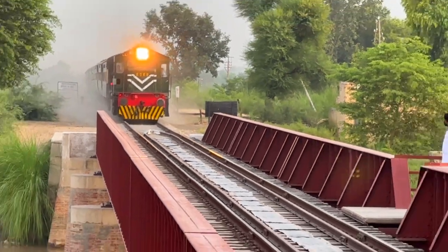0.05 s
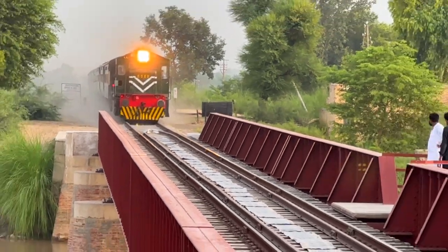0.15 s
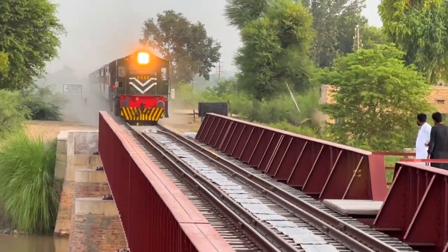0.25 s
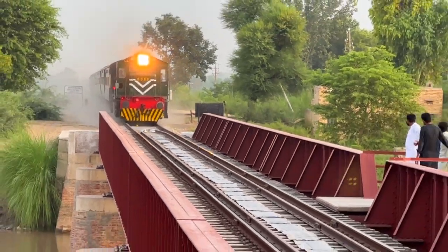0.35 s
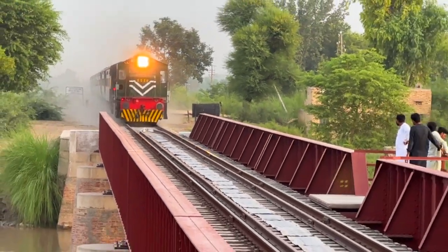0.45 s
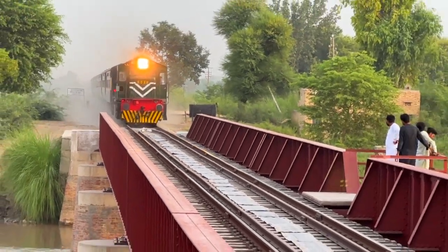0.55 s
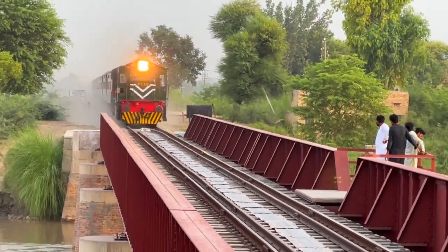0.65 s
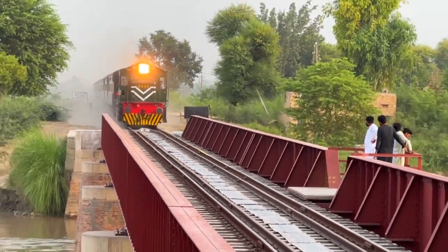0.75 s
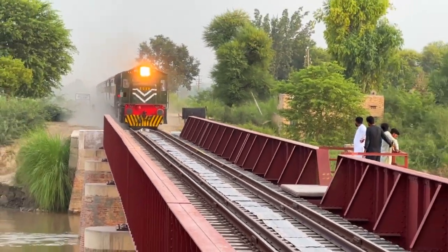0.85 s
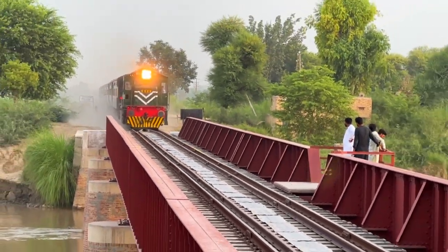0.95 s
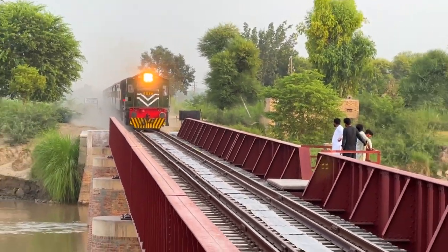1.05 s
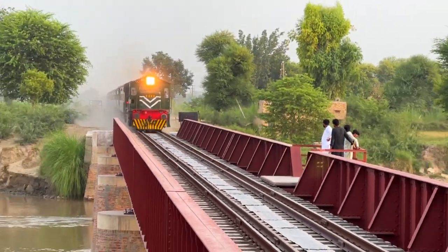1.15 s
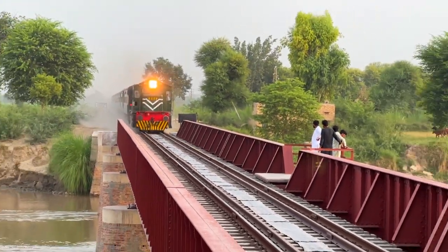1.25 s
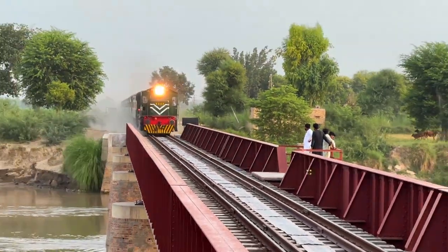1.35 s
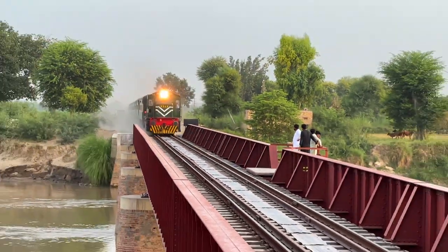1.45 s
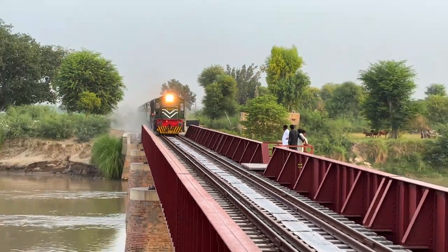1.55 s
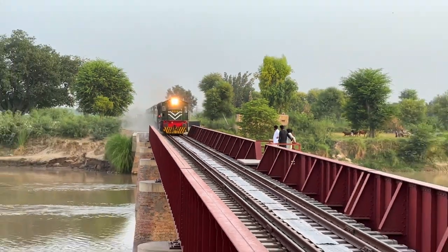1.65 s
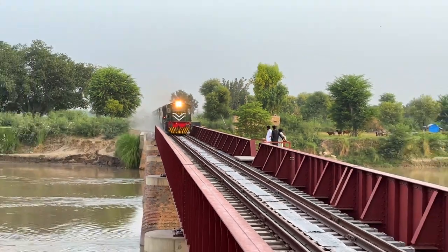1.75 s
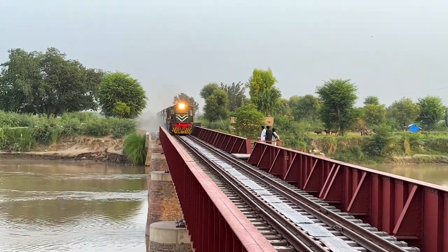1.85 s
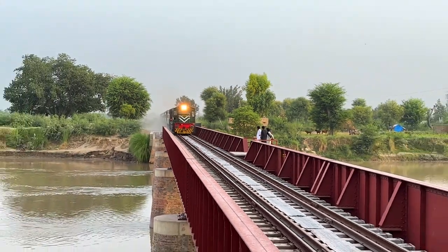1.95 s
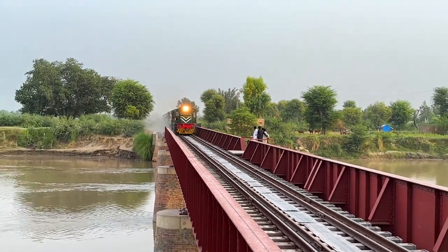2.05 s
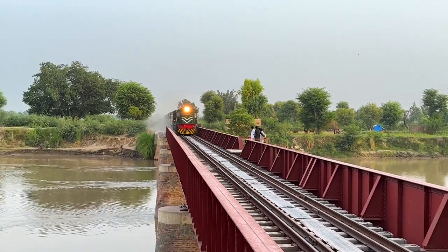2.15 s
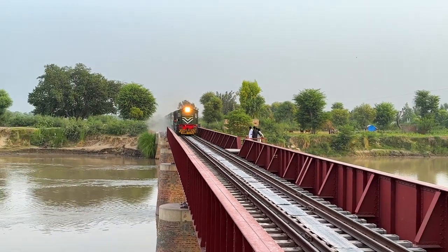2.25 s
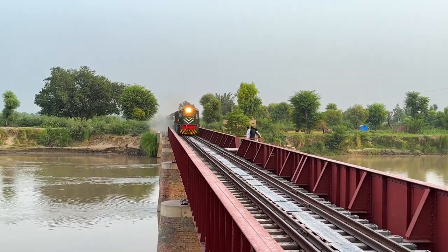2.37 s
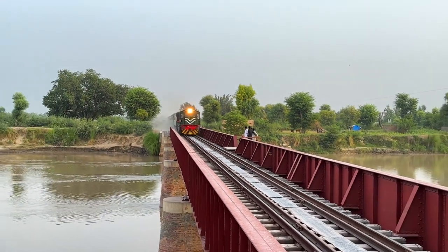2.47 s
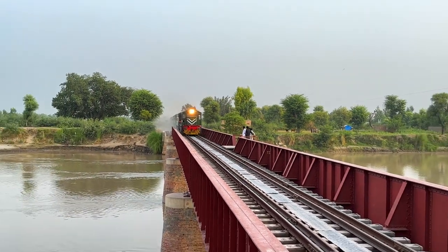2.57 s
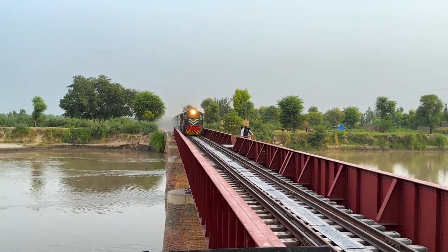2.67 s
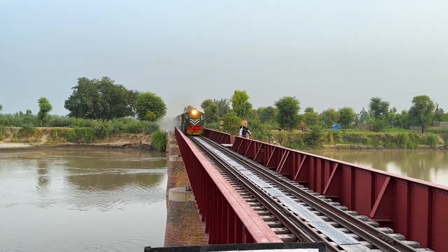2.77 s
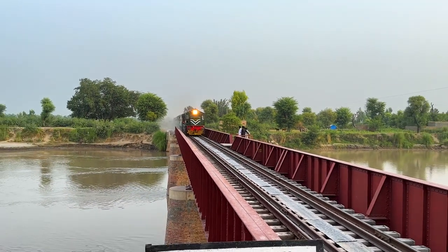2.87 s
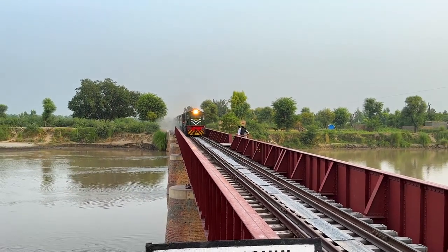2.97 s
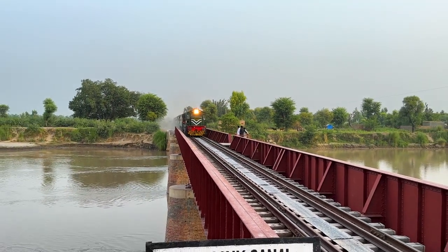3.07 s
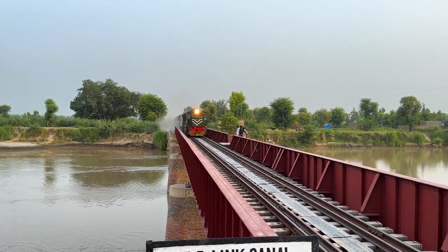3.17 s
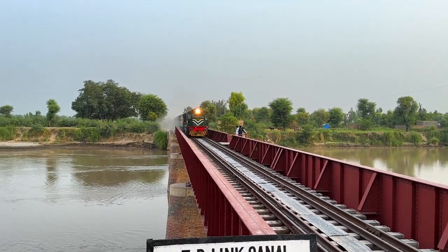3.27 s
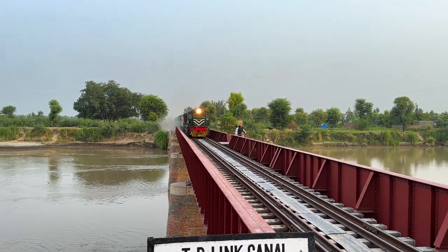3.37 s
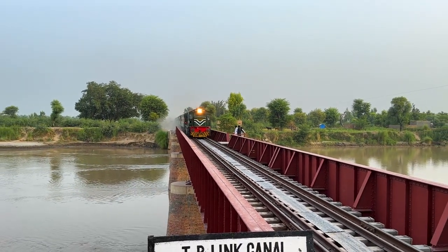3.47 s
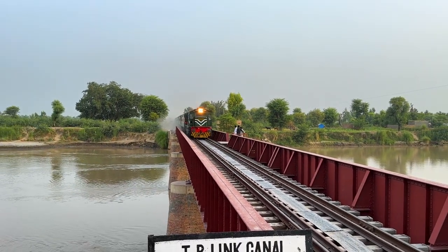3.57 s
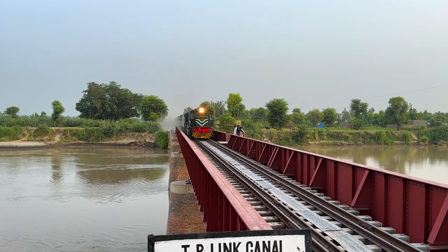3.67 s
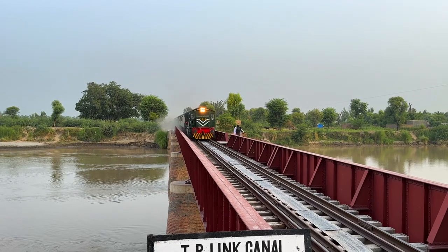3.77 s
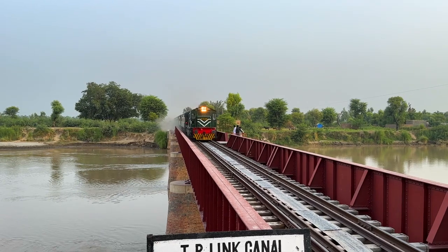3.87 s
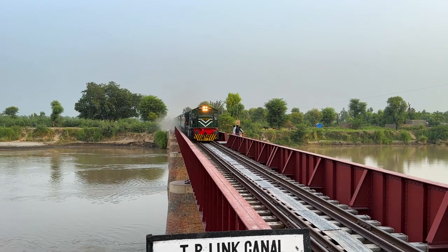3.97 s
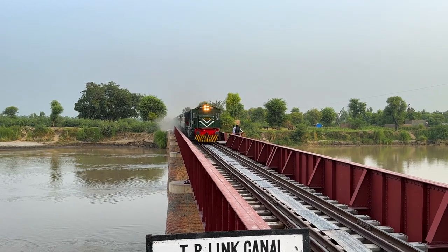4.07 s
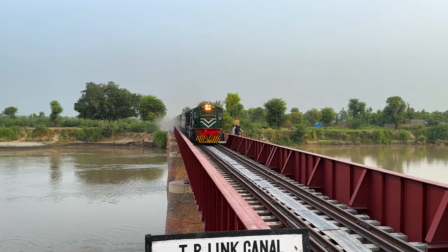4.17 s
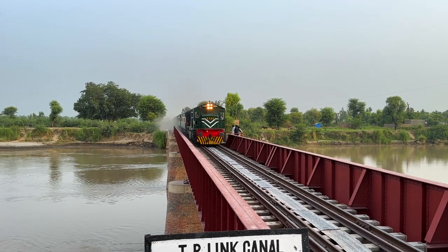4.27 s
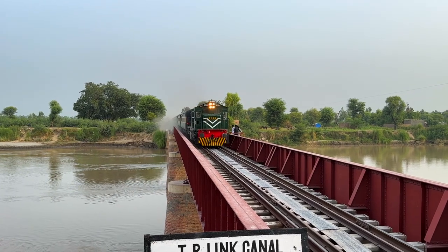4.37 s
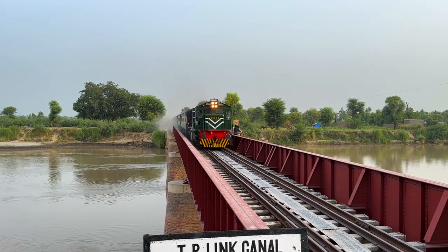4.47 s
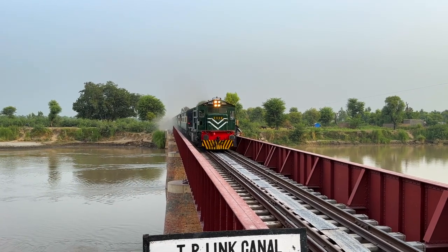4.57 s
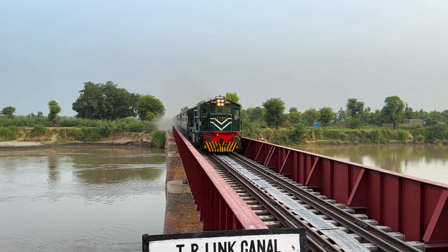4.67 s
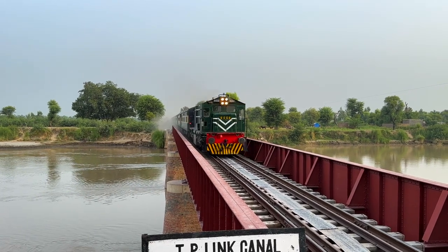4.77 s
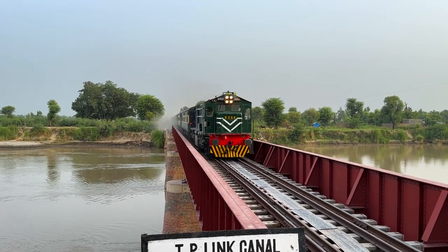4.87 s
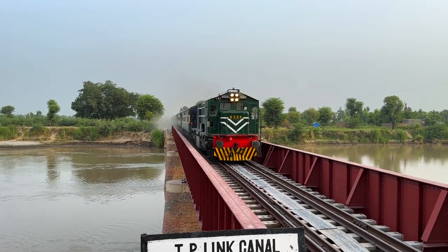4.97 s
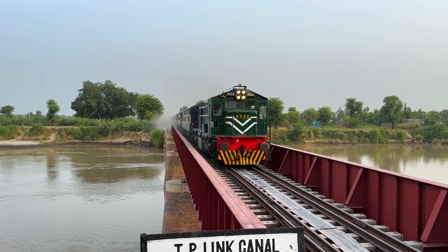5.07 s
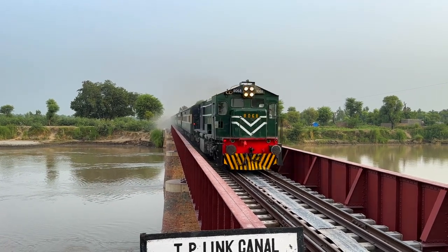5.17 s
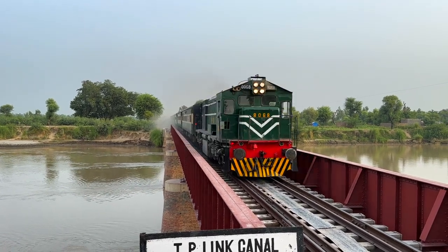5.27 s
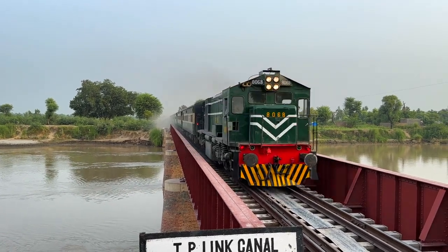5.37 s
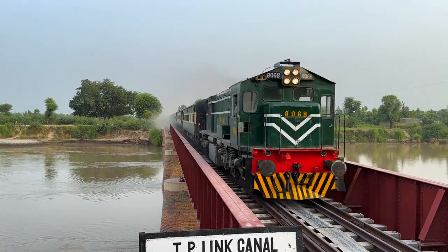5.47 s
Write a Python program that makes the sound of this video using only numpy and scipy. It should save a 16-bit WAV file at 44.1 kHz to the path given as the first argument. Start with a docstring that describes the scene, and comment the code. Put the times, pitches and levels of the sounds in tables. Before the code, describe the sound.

A diesel locomotive throbs closer and rolls onto a steel girder bridge, its rumble, ringing plates and wheel clacks growing to a loud metallic roar.

```python
"""Beside the track at a steel girder bridge, a diesel locomotive hauls its coaches nearer and rolls onto the span.
Firing pulses ring the exhaust stack; rolling noise resonates in span, plates and wheels; rail joints strike them.
The rails carry a wavering hum, filtered-noise hiss and ticks ahead of the train, with bursts of friction sizzle.
Plate swells, gliding ring-outs, grinding and clacks join in. Two closely spaced microphone ports hear it all."""
import sys
import numpy as np
from scipy import signal
from scipy.fft import rfft, irfft, next_fast_len
from scipy.io import wavfile
from scipy.ndimage import uniform_filter1d

SR = 44100
rng = np.random.default_rng(int(sys.argv[2]) if len(sys.argv) > 2 else 0)


def output_pcm(signal):
    """Save a mono or channel-first signal as 16-bit PCM at the path in sys.argv[1].

    Samples are clipped to [-1, 1] before scaling.
    """
    pcm = np.clip(np.atleast_2d(signal).T, -1, 1) * 32767
    wavfile.write(sys.argv[1], SR, np.round(pcm).astype(np.int16))


N = 243431
TIME = np.arange(N) / SR  # s
SIZE = next_fast_len(N + SR // 2)  # transform length, padded so that filters can ring out
FREQ = np.maximum(np.arange(SIZE // 2 + 1) * SR / SIZE, 1)  # Hz
SIDES = np.array([[1], [-1]])  # left, right


def from_db(db):
    """Logarithmic level: decibels become an amplitude gain."""
    return 10 ** (np.asarray(db) / 20)


def rms_one(x):
    """Power normalisation: scale to unit mean square."""
    return x / np.sqrt(np.mean(x ** 2) + 1e-20)


def steady(x, seconds=0.27):
    """Running power normalisation: unit power over every short stretch."""
    power = uniform_filter1d(np.mean(np.atleast_2d(x) ** 2, axis=0), max(int(seconds * SR), 64))
    return x / np.sqrt(power + 1e-12)


def in_time(rows):
    """Linear interpolation: one curve per column, a value for each sample."""
    s, *columns = np.transpose(rows)
    return [np.interp(TIME, s, column) for column in columns]


def around(s, before_s, after_s):
    """Time window: the samples around a moment."""
    return slice(*np.searchsorted(TIME, [s - before_s, s + after_s]))


def colour(points):
    """Spectral envelope: gain against log frequency, falling 20 dB per octave beyond the table."""
    hz, db = np.transpose(points)
    octaves_outside = np.abs(np.log2(FREQ / np.clip(FREQ, hz[0], hz[-1])))
    return from_db(np.interp(np.log(FREQ), np.log(hz), db) - 20 * octaves_outside)


def resonances(modes):
    """Modal superposition: parallel resonators of alternating sign."""
    response = 0
    for k, (hz, width, db) in enumerate(modes):
        resonator = 1 / (1 + 1j * (FREQ ** 2 - hz ** 2) / (FREQ * width))
        response = response + (-1) ** k * from_db(db) * resonator
    return response


def filtered(x, response):
    """Linear filtering: multiply the spectrum by a frequency response."""
    return irfft(rfft(x, SIZE) * response, SIZE)[..., :N]


def resonant(x, hz, width):
    """Resonant filtering: noise twice through one resonance, at unit power."""
    b, a = signal.iirpeak(hz, hz / width, fs=SR)
    once = signal.lfilter(b, a, x)
    return steady(signal.lfilter(b, a, once), seconds=0.062)


def drift(rate):
    """Low-pass random modulation: slow chance of spread 1, drawn at every 32nd sample."""
    size = SIZE // 32
    low_pass = 1 / (1 + (FREQ[:size // 2 + 1] / rate) ** 4)
    slow = irfft(rfft(rng.standard_normal(size)) * low_pass, size)
    return rms_one(np.interp(np.arange(N) * size / SIZE, np.arange(size), slow))


def wavering(hz, wander_hz, rate):
    """Frequency modulation: a tone of unit power whose pitch wanders."""
    turns = np.cumsum(hz + wander_hz * drift(rate)) / SR
    return np.sqrt(2) * np.sin(2 * np.pi * (rng.random() + turns))


def swaying(x, depth_s, rate):
    """Doppler effect: a slowly changing path shifts all the pitches of a sound up and down together."""
    reading = TIME + depth_s * drift(rate)
    return np.array([np.interp(reading, TIME, channel) for channel in x])


def swell(s, half_s, db):
    """Gaussian envelope: rises to its top and falls again."""
    out, part = np.zeros(N), around(s, .5, .5)
    out[part] = from_db(db) * np.exp(-np.minimum(((TIME[part] - s) / half_s) ** 2, 20))
    return out


def blows(rows, rise_s, fall_s):
    """Impact response: each blow swells quickly and dies away exponentially."""
    out = np.zeros(N)
    for s, db in rows:
        part = around(s, 0, 10 * fall_s)
        age = TIME[part] - s
        out[part] += from_db(db) * (1 - np.exp(-age / rise_s)) * np.exp(-age / fall_s)
    return out


def ring_outs(rows):
    """Transient modes: short notes of the steelwork, with any glide in pitch as the load moves on."""
    out = np.zeros(N)
    for (s, half_s, hz, db, glide_hz_per_s), phase in zip(rows, rng.random(len(rows))):
        part = around(s, .5, .5)
        age = TIME[part] - s
        turns = phase + hz * age + .5 * glide_hz_per_s * age ** 2
        out[part] += swell(s, half_s, db)[part] * np.sin(2 * np.pi * turns)
    return np.sqrt(2) * out


# diffuse share of the sound at the ports, far and near: (frequency [Hz], side-to-mid level [dB])
DIFFUSE_FAR = [(60, -26), (200, -20), (400, -14.5), (750, -11.5), (1200, -12), (2000, -65), (3400, -17),
               (6200, -57), (8300, -48), (9600, -11), (11500, -40), (13000, -40), (15000, -16)]
DIFFUSE_NEAR = [(60, -31), (200, -19), (400, -16.5), (750, -3), (1100, -9), (1600, 1.5), (2050, -9.5),
                (2400, -3.5), (4000, -4.5), (6000, -1), (9500, -4.5), (11500, -22), (13000, -15),
                (15000, -12)]


def noise(near, lead_s=0):
    """Spatial coherence: stereo white noise whose diffuse part changes from its far to its near share."""
    direct, diffuse = rng.standard_normal((2, N))
    far, close = filtered(diffuse, np.array([colour(DIFFUSE_FAR), colour(DIFFUSE_NEAR)]))
    if lead_s:
        direct = filtered(direct, np.exp(1j * np.pi * FREQ * lead_s * SIDES))  # left ahead of right
    return direct + ((1 - near) * far + near * close) * SIDES


def share(bass_db, loaded, part):
    """Load transfer: the level of one part of the bass shifts with the weight on the span."""
    empty_db, weight_db = part
    return bass_db + empty_db + weight_db * loaded


MIDWAY_DB = -28  # rolling level at which a law gives its own level


def follow(rolling_db, loaded, law):
    """Forced vibration: a part follows the rolling wheels, more strongly once they are on the span."""
    midway_db, slope, empty_db = law
    return midway_db + slope * (rolling_db - MIDWAY_DB) - empty_db * (1 - loaded)


# exhaust stack resonances: (frequency [Hz], width [Hz], relative level [dB])
STACK_MODES = [(89.5, 71, -7), (164.7, 24.7, 7.5), (206, 77, -2)]
# clean exhaust tones: (multiple of the firing rate [1], relative level [dB])
EXHAUST_TONES = [(1, -0.5), (2, -3.5)]
FIRING_HZ = 80.9  # mean rate


def exhaust(stack_db, throb_db, rough=0.18, gas=0.17, wander=.007, surge_db=2.5, count=12):
    """Pulse excitation: unequal cylinder puffs ring the stack over a clean throb at the firing rate."""
    turns = np.cumsum(FIRING_HZ * (1 + wander * drift(4))) / SR
    fires = np.flatnonzero(np.diff(np.floor(turns)))
    cylinders = 1 + rough * rng.standard_normal(count)
    puffs = np.zeros(N)
    puffs[fires] = cylinders[np.arange(len(fires)) % count] + rough * rng.standard_normal(len(fires))
    puffs += gas * np.exp(-3 * (turns % 1)) * rng.standard_normal(N)  # turbulent gas follows each puff
    muffler = 1 / (1 + 1j * FREQ / 420) ** 2
    stack = from_db(stack_db) * steady(filtered(puffs, resonances(STACK_MODES) * muffler), seconds=0.052)
    throb = 0
    for multiple, db in EXHAUST_TONES:
        level = from_db(throb_db + db + surge_db * drift(5.4))
        throb = throb + level * np.sin(2 * np.pi * multiple * turns)
    return stack + np.sqrt(2) * throb


# wheels on rail joints, before attack and decay: (time [s], plate clang [dB], span thump [dB])
RAIL_JOINTS = [(1.57, -16.5, -40), (1.795, -22, -30), (2.071, -33, -25), (2.201, -30, -25),
               (2.37, -37, -20), (2.644, -16, -31), (2.835, -32, -12.5), (3.29, -25, -31),
               (3.489, -15, -27), (3.668, -26, -17), (3.826, -24, -14), (3.94, -26, -27), (4.465, -23, -24),
               (4.538, -15, -30), (4.66, -18, -17), (4.825, -26, -16), (4.94, -15, -17), (5.14, -18, -25),
               (5.306, -13, -14), (5.42, -25, -13)]
# spectral envelope of the span: (frequency [Hz], relative level [dB])
SPAN_COLOUR = [(20, -21), (35, -22), (48, -7.5), (62, -0.5), (84, -6), (108, -3), (140, -11), (200, -11.5),
               (300, -24)]
# higher boom right under the locomotive, passed twice: (frequency [Hz], width of one pass [Hz])
CLOSE_SPAN_MODE = (102.3, 40)
# deep surges of the span: (time of top [s], half length [s], pitch [Hz], level [dB])
SPAN_SURGES = [(0.898, .045, 82, -31.5), (1.314, 0.051, 82.4, -29), (1.48, 0.047, 79.5, -29.5),
               (1.868, 0.04, 80, -30), (1.997, 0.069, 106, -27), (2.259, 0.046, 68.5, -28),
               (2.762, 0.057, 72.4, -26), (3.059, 0.027, 130, -22), (3.55, 0.044, 125, -23),
               (3.35, .036, 85, -19), (3.7, .04, 69, -20), (3.79, .05, 172, -23.5), (3.807, 0.052, 76, -18),
               (3.83, 0.028, 120, -17.5), (3.951, 0.027, 75, -17.5), (4.63, .04, 89, -18),
               (4.681, .035, 80.6, -13.5), (4.98, 0.065, 101, -23)]


def span_rumble(rumble_db, near, close_db=7):
    """Structure-borne sound: the span rumbles under the wheels, thumps at each joint and surges at times."""
    thump_rows = [(s, thump_db) for s, _, thump_db in RAIL_JOINTS]
    thumps = blows(thump_rows, rise_s=0.0015, fall_s=0.024)
    close_response = resonances([(*CLOSE_SPAN_MODE, 0)]) ** 2
    close = from_db(close_db) * near ** 6 * filtered(noise(near), close_response)
    rumble = steady(filtered(noise(near), colour(SPAN_COLOUR)) + close, seconds=0.051)
    surges = ring_outs([(*surge, 0) for surge in SPAN_SURGES])  # no glide
    return np.hypot(from_db(rumble_db), thumps) * rumble + surges


# web plates of the girders, before contact smoothing: (frequency [Hz], width [Hz], relative level [dB])
PLATE_MODES = [(232, 120, -19.5), (297, 26, -3.5), (363, 37, -2.5), (411, 30.6, -3.5), (469, 60, -7.5),
               (518, 33.5, -4.5), (571, 43, -9.5)]
# plates and wheel discs ringing out: (time of top [s], half length [s], pitch [Hz], level [dB], glide [Hz/s])
STEEL_RINGS = [(.38, 0.062, 398, -32.5, -100), (2.13, .04, 508, -29.5, 0), (2.26, 0.012, 507, -25.5, 0),
               (2.42, 0.039, 548, -25, -500), (2.67, 0.047, 517, -23.5, -300),
               (3.46, 0.045, 518, -21.5, 200), (3.76, .07, 428, -27, 0), (4.0, 0.061, 529.5, -22.5, 0),
               (4.33, .033, 513, -19, 600), (4.475, 0.016, 710, -20, -1500),
               (4.555, .035, 415, -15.5, -700), (4.65, 0.022, 530.5, -17, -400),
               (4.775, 0.019, 603, -18, 0), (4.78, .03, 1040, -28.5, -1200),
               (4.84, 0.038, 385, -15.5, -1100), (4.95, .035, 410, -22, 0), (5.125, 0.047, 863.5, -22.5, 0),
               (5.16, 0.032, 529, -20, 0), (5.17, 0.044, 435, -22, 700), (5.21, .022, 577, -20, 0),
               (5.25, 0.021, 696, -17, -1200), (5.285, .022, 464, -15, -1500), (5.32, 0.023, 538, -19, 3),
               (5.345, 0.045, 380, -20.5, 1100), (5.4, 0.038, 521, -17, 1200),
               (5.44, 0.042, 720, -20.5, 900), (5.495, .02, 605, -17, -1000)]
# spectral envelope of the wheel roar, also part of each clang: (frequency [Hz], relative level [dB])
ROAR_COLOUR = [(150, -10), (270, -1.5), (520, 3), (590, -1.5), (640, 0.5), (712, 3), (780, 1.5), (860, 2.5),
               (1000, 0.5), (1130, -6.5), (1300, -18), (1800, -22.5)]
GIRDER_LOW, GIRDER_HIGH = (263.4, 116), (493, 170)  # broad ringing, passed twice: Hz, width of one pass in Hz


def girders(drone_db, near, loaded, low_db=-14, weight_db=11, close_low_db=-2, high_db=-3):
    """Modal excitation: rough treads and joints ring the plates, low ones under weight, high ones close by."""
    contact = 1 / (1 + (FREQ / 760) ** 6) / (1 + (170 / FREQ) ** 4)  # the contact patch smooths short bumps
    plates = resonances(PLATE_MODES) * contact
    ringing = swaying(filtered(noise(near), plates), depth_s=.0014, rate=2.96)
    close = near ** 6
    low_gain = from_db(low_db + weight_db * loaded ** 2 + close_low_db * close)
    low = low_gain * filtered(noise(near), resonances([(*GIRDER_LOW, 0)]) ** 2)
    high = from_db(high_db) * close * filtered(noise(near), resonances([(*GIRDER_HIGH, 0)]) ** 2)
    rolling = from_db(drone_db) * steady(ringing + low + high, seconds=0.07)
    struck = plates + contact * resonances([(302, 5.9, 0.0051)]) + from_db(-31.0) * colour(ROAR_COLOUR)
    clang_rows = [(s, clang_db) for s, clang_db, _ in RAIL_JOINTS]
    clangs = blows(clang_rows, rise_s=0.0016, fall_s=0.033)
    knocks = clangs * steady(filtered(noise(near), struck), seconds=0.044)
    return rolling + knocks + ring_outs(STEEL_RINGS)


def wheel_roar(rolling_db, near, roar_db=1.4, close_db=2.0):
    """Rolling contact noise: a mid-range roar; the closest bogie adds a hollow ring of its wheel discs."""
    rolling = swaying(filtered(noise(near), colour(ROAR_COLOUR)), depth_s=0.001207, rate=4.05)
    discs = from_db(10.5) * near ** 12 * filtered(noise(near), resonances([(627, 400, 0)]) ** 2)
    return from_db(rolling_db + roar_db + close_db * near) * steady(rolling + discs, seconds=0.07)


# singing hum of the track, before wavering: (time [s], reference level [dB], reference pitch [Hz])
HUM_COURSE = [(0, -45, 419), (.24, -46, 419.5), (.33, -33, 418.5), (.5, -37, 417.7), (.75, -34, 415.5),
              (1.1, -28.5, 418), (1.2, -31, 418), (1.28, -27, 417.7), (1.5, -25, 419.2), (1.58, -27.5, 419),
              (1.95, -28.5, 418.5), (2.3, -38, 416.1), (4.0, -28, 418.6), (5.52, -25, 413)]
# its tones: (multiple of the pitch [1], relative level [dB], rms wander [Hz])
HUM_PARTIALS = [(1, -1, 0.82), (.925, -11, 3.097), (.86, -19, 1.8), (1.052, -15, 3.2), (1.187, -19, 1.95),
                (1.247, -16.5, 2.5), (2.12, -23, 3.2)]


def track_hum(waver_db=1.4):
    """Inharmonic partials: one clear, steadier tone among fainter, more wavering ones."""
    hum_db, pitch_hz = in_time(HUM_COURSE)
    tones = 0
    for multiple, db, wander_hz in HUM_PARTIALS:
        tones = tones + from_db(db) * wavering(multiple * pitch_hz, wander_hz, rate=5.4)
    return from_db(hum_db + waver_db * drift(15)) * tones


# spectral envelopes of the hiss, far and near: (frequency [Hz], relative level [dB])
FAR_HISS_COLOUR = [(700, -9), (1200, 2), (1500, 1.5), (2000, -2), (2700, -5.5), (4000, -12), (5400, -19.5),
                   (6900, -16.5), (8500, -20.5), (10000, -28.5), (15000, -52)]
NEAR_HISS_COLOUR = [(800, -17), (1250, 2.5), (1600, -7), (2100, 2), (2420, -8.5), (2650, -2.5), (3200, -5),
                    (4600, -4.5), (5400, -12), (6200, -20.5), (7200, -11.5), (10000, -50)]


def rail_hiss(hiss_db, bright_db, near, flutter_db=0.7, split_hz=2500):
    """Waveguide transmission: a smooth far hiss; near by it moves left and takes on the wheels' colour."""
    far = rms_one(filtered(noise(0), colour(FAR_HISS_COLOUR)))
    close = rms_one(filtered(noise(1.0, lead_s=2.4e-5), colour(NEAR_HISS_COLOUR)))
    mix = np.sqrt(1 - near) * far + np.sqrt(near) * close
    dull = filtered(mix, 1 / (1 + (FREQ / split_hz) ** 8))
    hiss = from_db(hiss_db) * steady(dull) + from_db(bright_db) * steady(mix - dull)
    return from_db(1.0 * near + flutter_db * drift(26)) * hiss


SPURT_RELEASE_S = 0.089


def held(start_s, length_s, attack_s):
    """Amplitude envelope: linear attack, hold and release of a spurt."""
    attack = np.clip((TIME - start_s) / attack_s, 0, 1)
    release = np.clip((start_s + length_s - TIME) / SPURT_RELEASE_S + 1, 0, 1)
    return attack * release


# sizzle of the wheel treads, before its grain: (time [s], level [dB])
TREAD_SIZZLE = [(0, -69), (1.22, -71), (1.36, -61), (1.8, -64), (2.36, -63), (2.52, -54.5), (3.15, -49.5),
                (3.5, -49), (3.6, -42), (4.05, -45), (4.16, -41), (4.68, -42.5), (4.79, -44), (5.17, -44.5),
                (5.52, -35.5)]
# spectral envelope of the sizzle: (frequency [Hz], relative level [dB])
SIZZLE_COLOUR = [(2500, -22), (4500, -3), (6000, -4.5), (7000, 0), (8300, 3.5), (9300, 2), (10300, 3),
                 (11600, -.8), (13200, -2.8), (15600, -3)]
# high modes of the rails: (frequency [Hz], width [Hz], relative level [dB])
HIGH_RAIL_MODES = [(6968, 16, 0), (7273, 18, 1), (8155, 12, 2), (8473, 26, 3), (8817, 12, 2), (9335, 18, 0),
                   (10170, 12, 4), (10437, 26, 1), (11061, 16, 1), (11418, 12, 1), (12989, 22, 0),
                   (14967, 12, 1)]
# spurts of harsh wheel hiss, length before release: (start [s], length [s], attack [s],
# sizzle [dB], rasp [dB], rasp centre [Hz], singing [dB])
HISS_SPURTS = [(1.73, 0.21, .01, -67, -44, 2750, -72), (2.126, 0.501, 0.028, -70, -46.5, 2200, -72),
               (3.54, 0.08, .025, -54, -40.5, 3300, -60), (4.808, .16, .015, -38.5, -40.5, 4230, -43),
               (5.26, 0.015, 0.0089, -30, -34, 3830, -42), (5.316, 0.09, 0.014, -32.5, -37.5, 4200, -50),
               (5.46, .11, .015, -49, -39, 3800, -44)]
# ticks running ahead in the rails, before attack and decay: (time [s], strength [dB])
RAIL_TICKS = [(1.7607, -53), (1.9503, -55), (1.9717, -49), (1.982, -51), (2.0291, -52), (2.039, -57),
              (2.1189, -48), (2.1503, -54), (2.2012, -56), (2.3538, -46), (2.4012, -54), (2.4217, -54),
              (2.446, -55), (2.4601, -47), (2.5045, -42), (2.5704, -52), (2.965, -47), (3.04, -48),
              (4.622, -42), (4.655, -40), (4.855, -34), (4.88, -35), (4.905, -36), (5.262, -34),
              (5.326, -38)]
RASP_WIDTH_HZ, RASP_ROUGH_DB = 2300, 1.8  # width of one of two passes; rms roughness
SINGING_HZ, SINGING_WIDTH_HZ = 10000, 2300  # passed twice; width of one pass


def sizzle(near, grain_db=1.0, sputter_db=1.0):
    """Frictional excitation: treads, sputtering spurts and ticks drive high rail modes; spurts rasp lower."""
    ringing = sum(np.abs(resonances([mode])) ** 2 for mode in HIGH_RAIL_MODES)
    rail = colour(SIZZLE_COLOUR) * np.sqrt(1 + 2 * ringing)
    friction_gain = from_db(in_time(TREAD_SIZZLE)[0] + grain_db * drift(60))
    friction = friction_gain * rms_one(filtered(noise(near), rail))
    harsh = from_db(sputter_db * drift(70)) * rms_one(filtered(noise(near), rail))
    singing_response = rail * resonances([(SINGING_HZ, SINGING_WIDTH_HZ, 0)]) ** 2
    singing = from_db(sputter_db * drift(40)) * rms_one(filtered(noise(near), singing_response))
    grit = from_db(RASP_ROUGH_DB * drift(90)) * noise(near)
    spurts = 0
    for s, length_s, attack_s, db, rasp_db, rasp_hz, singing_db in HISS_SPURTS:
        rasp = from_db(rasp_db) * resonant(grit, rasp_hz, RASP_WIDTH_HZ)
        spurt = from_db(db) * harsh + rasp + from_db(singing_db) * singing
        spurts = spurts + held(s, length_s, attack_s) * spurt
    tick_noise = rms_one(filtered(noise(near), rail * resonances([(10300, 4500, 0)]) ** 2))
    ticks = blows(RAIL_TICKS, rise_s=.002, fall_s=0.012) * tick_noise
    return friction + spurts + ticks


# loudest swells of the strongest plate mode: (time of top [s], half length [s], level [dB])
BOOM_SWELLS = [(1.577, 0.024, -32), (1.66, 0.033, -27.5), (1.824, 0.018, -27), (2.086, 0.017, -18.5),
               (2.17, 0.017, -21.5), (2.215, 0.015, -14), (2.485, 0.018, -16.5), (2.405, 0.02, -20.5),
               (2.635, 0.034, -23.5), (2.733, .04, -21.5), (2.856, .016, -21), (2.95, 0.017, -21.5),
               (3.336, 0.054, -18.5), (3.492, 0.02, -17), (3.567, .026, -15.5), (3.679, 0.031, -17.5),
               (3.766, .029, -19), (4.188, 0.023, -15.5), (4.356, 0.033, -20), (4.485, .021, -17.5),
               (4.673, 0.022, -17.5), (4.867, 0.023, -18)]
BOOM_HZ, BOOM_RISE_HZ = 320, 6  # mean pitch far off, rise at full nearness
BOOM_WIDTH_HZ, BOOM_DB = 35, -29  # width of one of two passes; level between swells under full weight


def panel_boom(near, loaded, rough_db=-12):
    """Dominant mode: the strongest plate note wavers in pitch under the weight and swells now and then."""
    boom_response = resonances([(BOOM_HZ, BOOM_WIDTH_HZ, 0)]) ** 2
    rough = steady(filtered(noise(near), boom_response), seconds=0.058)
    tone = wavering(BOOM_HZ + BOOM_RISE_HZ * near, wander_hz=3.21, rate=8.7)
    note = tone + from_db(rough_db) * rough
    swells = sum(swell(*row) for row in BOOM_SWELLS)
    return np.hypot(loaded * from_db(BOOM_DB), swells) * rms_one(note)


# surges as a bogie grinds along the rails, each passed twice:
# (time of top [s], half length [s], centre [Hz], width of one pass [Hz], level [dB])
BOGIE_GRINDS = [(1.84, 0.066, 263, 110, -26.5), (3.5, 0.072, 604, 300, -30.5),
                (4.338, 0.051, 900, 401, -21.5), (4.493, 0.081, 860, 607, -24.5),
                (4.783, 0.041, 870, 650, -16.5), (5.125, 0.065, 795.6, 350, -19.5),
                (5.228, 0.033, 693, 447, -16), (5.312, 0.076, 440, 217, -21), (5.445, 0.034, 673, 350, -20)]
# hard clacks of the nearest wheels, before attack and decay: (time [s], centre [Hz], strength [dB])
WHEEL_CLACKS = [(3.752, 732, -19), (3.827, 790, -16), (4.305, 600, -20), (4.461, 760, -15),
                (4.525, 801, -14), (4.672, 615, -11), (4.753, 640, -18), (5.087, 770, -9),
                (5.173, 716, -11), (5.238, 686, -12), (5.403, 620, -12)]
CLACK_FALL_S, CLACK_WIDTH_HZ = 0.0082, 500  # decay time constant, width of one of two passes


def grinding(near):
    """Forced resonance: each surge and each clack of the wheels rings its own broad resonance."""
    contact = filtered(noise(near), 1 / (1 + (FREQ / 1150) ** 12))
    out = np.zeros((2, N))
    for s, half_s, hz, width, db in BOGIE_GRINDS:
        part = around(s, .5, .5)
        out[:, part] += swell(s, half_s, db)[part] * resonant(contact[:, part], hz, width)
    for s, hz, db in WHEEL_CLACKS:
        part = around(s, .1, .2)
        clack = blows([(s, db)], rise_s=0.0014, fall_s=CLACK_FALL_S)[part]
        out[:, part] += clack * resonant(contact[:, part], hz, CLACK_WIDTH_HZ)
    return out


# the locomotive on its way: (time [s], nearness [0-1], share of its weight on the span [0-1])
LOCOMOTIVE_POSITION = [(0, 0, 0), (1.35, 0, 0.23), (1.8, 0, 0.81), (2.7, 0.01, 1), (2.95, 0.39, 0.84),
                       (3.6, 0.64, 0.85), (5.2, 0.93, 0.9)]
# rolling noise of the wheels, which also drives girders and rails: (time [s], reference level [dB])
WHEEL_ROLLING = [(0, -39.5), (.8, -38), (1.4, -34.5), (1.9, -30), (2.6, -27.5), (3.1, -26.5), (3.5, -24.5),
                 (4.22, -23), (4.45, -20), (4.6, -20), (4.75, -19.5), (4.9, -20), (5.05, -22), (5.2, -20.5),
                 (5.33, -19.5), (5.52, -19)]
# bass shared by exhaust and span: (time [s], reference level [dB])
BASS_LEVEL = [(0, -33), (.35, -34.5), (.85, -31), (1.3, -29), (1.68, -29.5), (1.87, -24), (2.15, -27.5),
              (2.8, -23.5), (3.45, -21), (3.7, -19.5), (4.3, -17.5), (4.75, -18), (5.05, -21.5),
              (5.52, -17)]
# shares of the bass: (offset with span empty [dB], change under full weight [dB])
SPAN_BASS_SHARE = (-5, 5.1)
STACK_BASS_SHARE = (-5, -0.87)
THROB_BASS_SHARE = (-9, -4)
# following the wheels: (level at MIDWAY_DB [dB], slope [dB/dB], reduction with span empty [dB])
GIRDER_LAW = (-21, 0.65, 8.6)
DULL_HISS_LAW = (-36, 0.54, 2.7)
CLEAR_HISS_LAW = (-43, 0.51, 2.56)


def scene():
    """Superposition: all sources add; the bass shifts from exhaust to span as the locomotive rolls on."""
    rolling_db, = in_time(WHEEL_ROLLING)
    bass_db, = in_time(BASS_LEVEL)
    near, loaded = np.clip(in_time(LOCOMOTIVE_POSITION), 0, 1)
    engine = exhaust(share(bass_db, loaded, STACK_BASS_SHARE), share(bass_db, loaded, THROB_BASS_SHARE))
    rumble = span_rumble(share(bass_db, loaded, SPAN_BASS_SHARE), near)
    drone = girders(follow(rolling_db, loaded, GIRDER_LAW), near, loaded)
    roar = wheel_roar(rolling_db, near)
    hum = track_hum()
    dull_db = follow(rolling_db, loaded, DULL_HISS_LAW)
    bright_db = follow(rolling_db, loaded, CLEAR_HISS_LAW)
    hiss = rail_hiss(dull_db, bright_db, near)
    treble = sizzle(near)
    boom = panel_boom(near, loaded)
    return engine + rumble + drone + roar + hum + hiss + treble + boom + grinding(near)


# the casing turns the phase between the ports: (frequency [Hz], left lead [rad])
CASING_PHASE = [(0, 0), (450, 0), (780, -.3), (1200, 0), (6700, 0), (7200, 1.1), (7850, 3.05), (8650, 3.1),
                (9200, 1.4), (10300, .9), (11000, 0), (13200, 0), (14400, -1.1), (15800, -1.7)]
# the casing shades one of the ports: (frequency [Hz], left minus right level [dB])
CASING_BALANCE = [(100, 0.3), (300, 0.25), (1200, 1), (1800, -2), (2800, 1), (4500, 0.5), (6000, 1.5),
                  (9800, -0.5), (12000, 0.5)]
CUTOFF_HZ = 15800


def record(dry):
    """Diffraction and saturation: peaks are rounded, the ports differ in phase and level, the top is cut."""
    turn = np.interp(FREQ, *np.transpose(CASING_PHASE))
    shade = from_db(np.interp(FREQ, *np.transpose(CASING_BALANCE)))
    ports = np.exp(.5 * (np.log(shade) + 1j * turn) * SIDES)  # half the difference to each side
    low_pass = 1 / np.sqrt(1 + (FREQ / CUTOFF_HZ) ** 240)
    rounded = dry / (1 + np.abs(dry / .98) ** 10) ** .1
    return filtered(rounded, ports * low_pass)


dry = scene()
out = record(dry)
output_pcm(out)
```